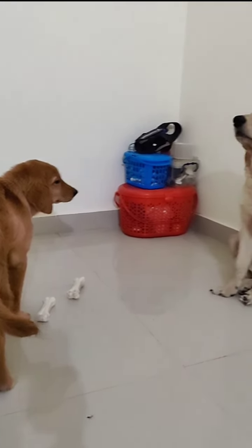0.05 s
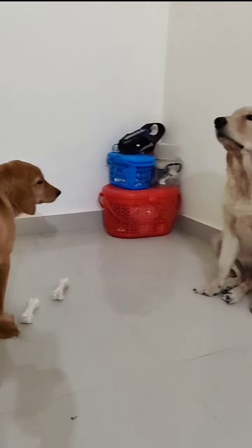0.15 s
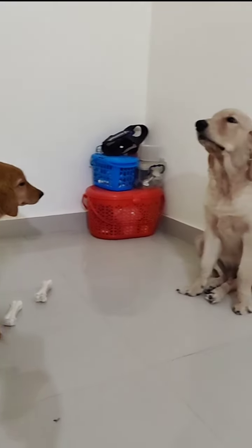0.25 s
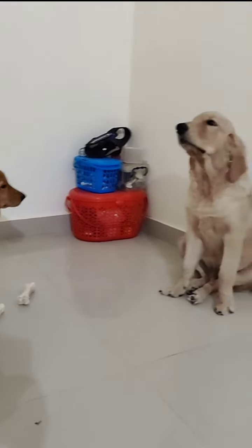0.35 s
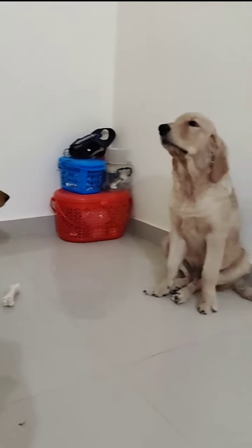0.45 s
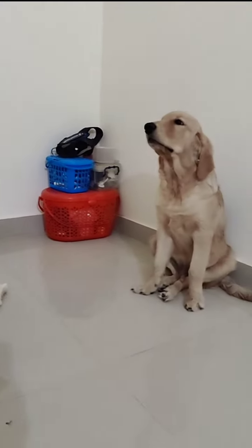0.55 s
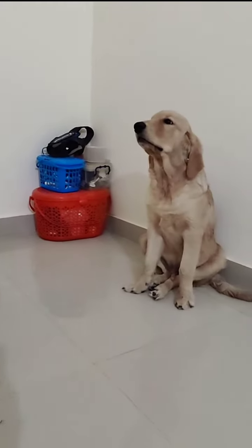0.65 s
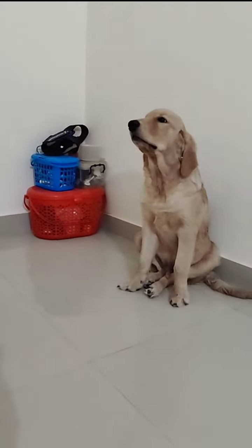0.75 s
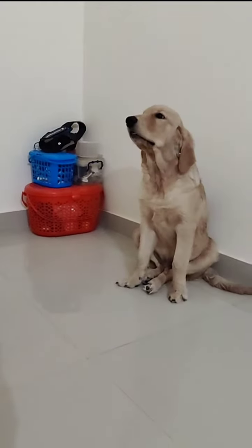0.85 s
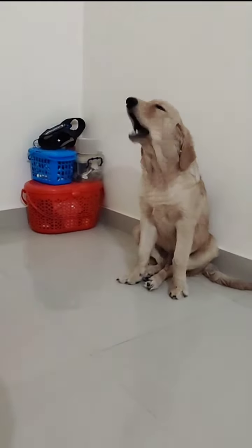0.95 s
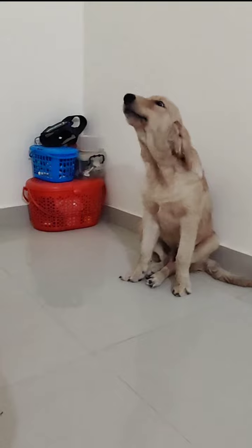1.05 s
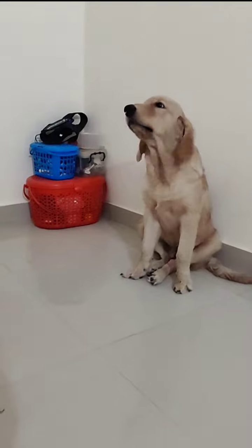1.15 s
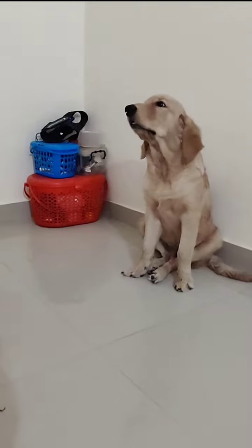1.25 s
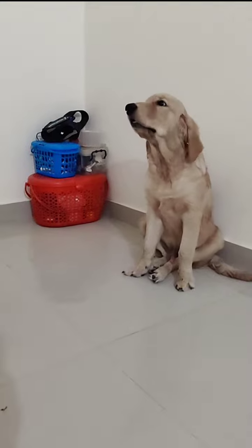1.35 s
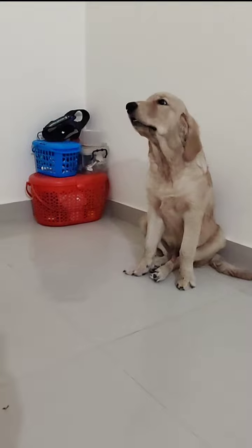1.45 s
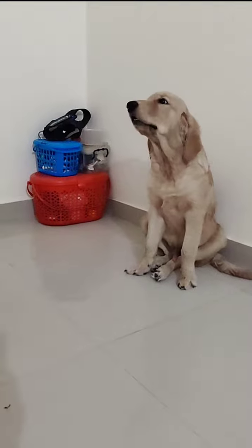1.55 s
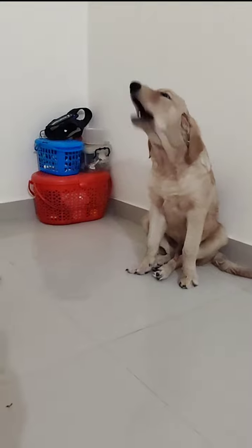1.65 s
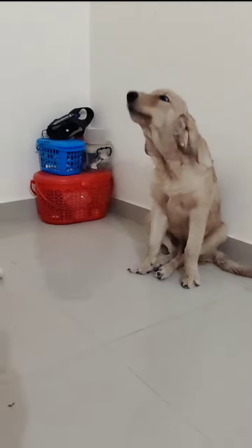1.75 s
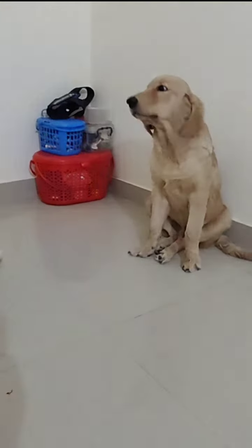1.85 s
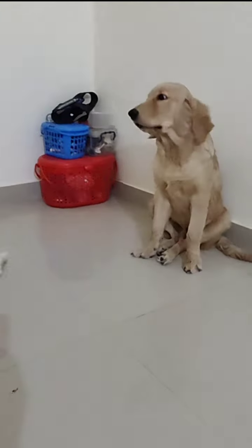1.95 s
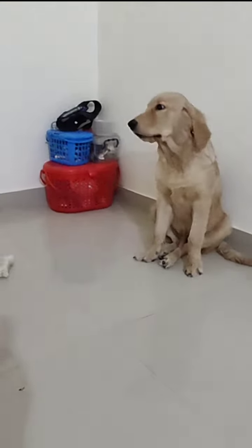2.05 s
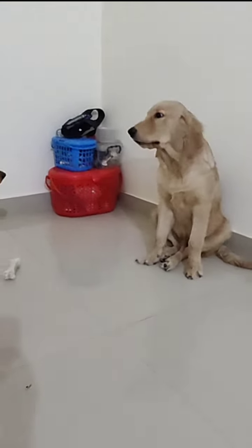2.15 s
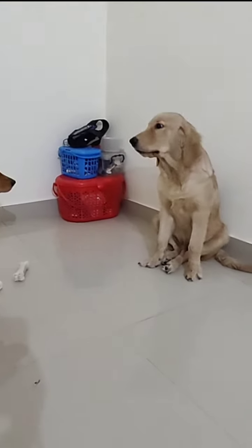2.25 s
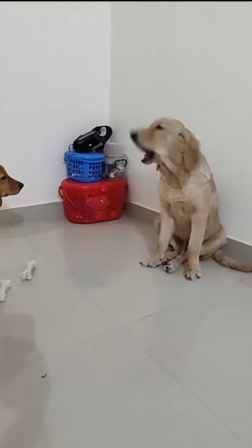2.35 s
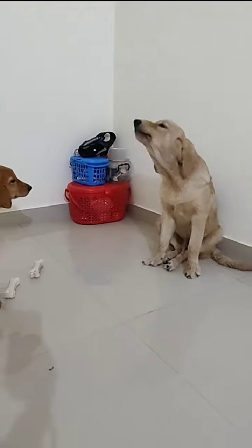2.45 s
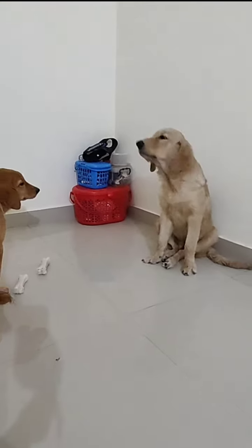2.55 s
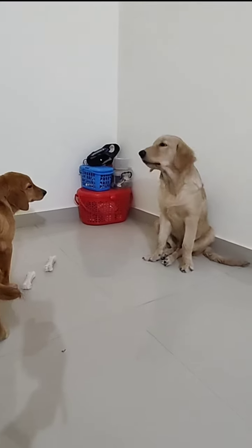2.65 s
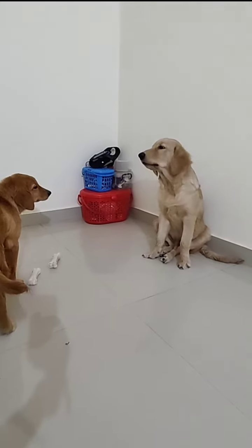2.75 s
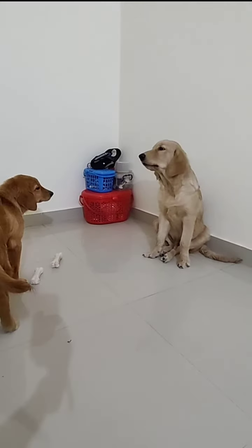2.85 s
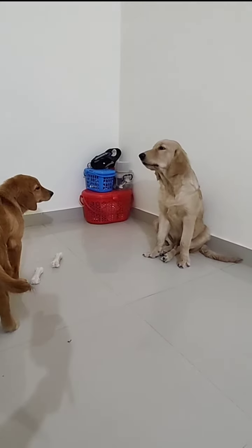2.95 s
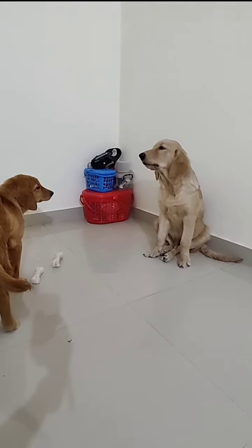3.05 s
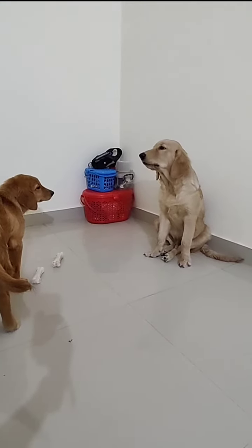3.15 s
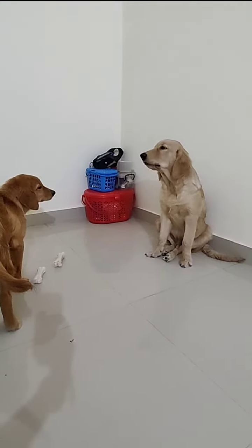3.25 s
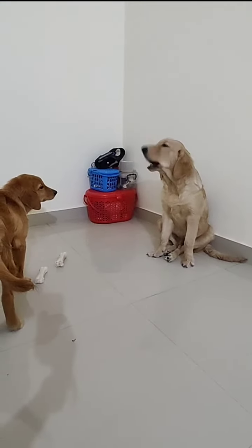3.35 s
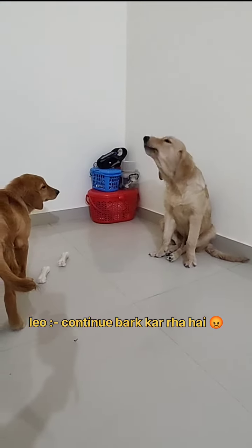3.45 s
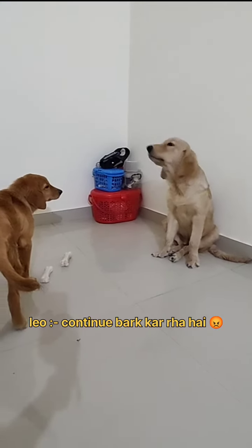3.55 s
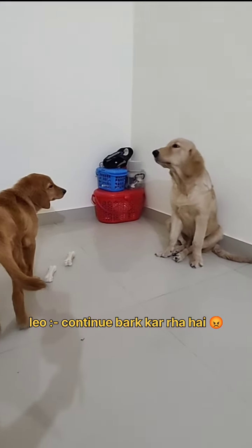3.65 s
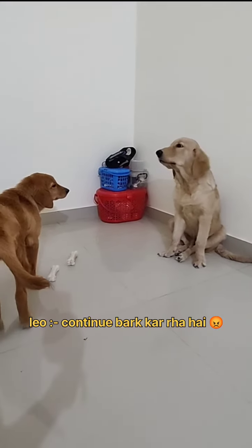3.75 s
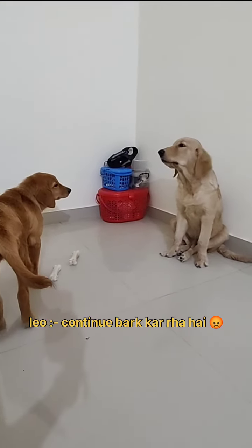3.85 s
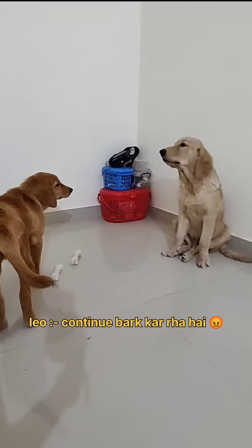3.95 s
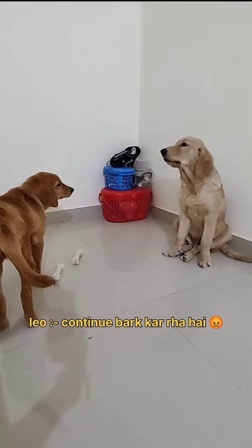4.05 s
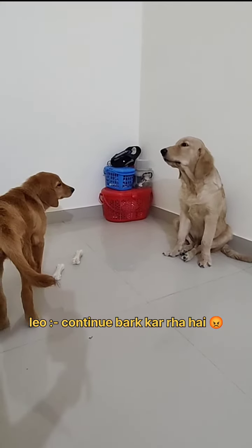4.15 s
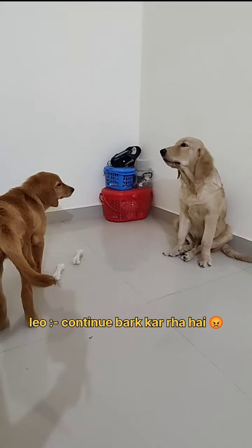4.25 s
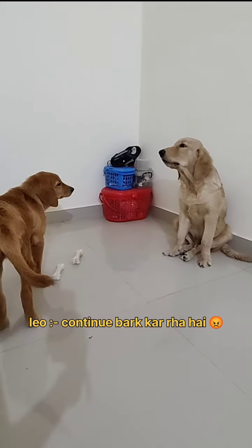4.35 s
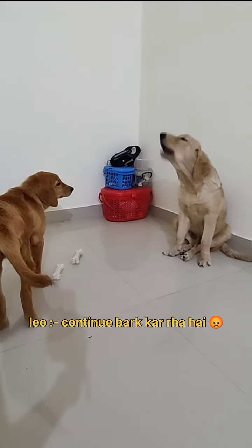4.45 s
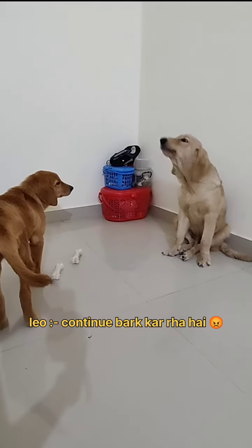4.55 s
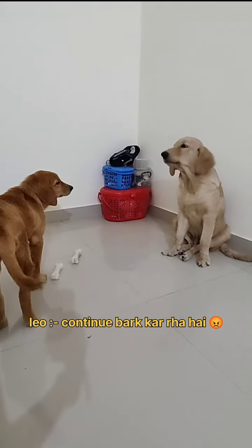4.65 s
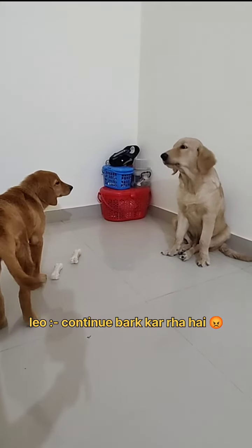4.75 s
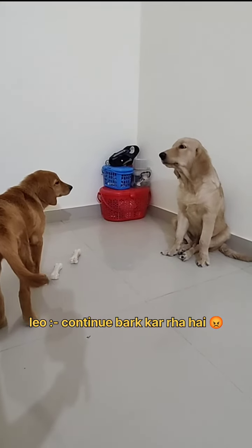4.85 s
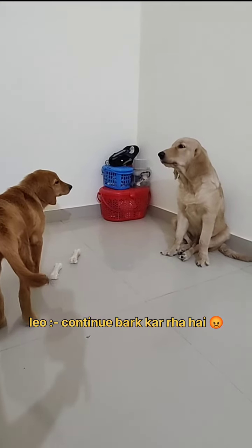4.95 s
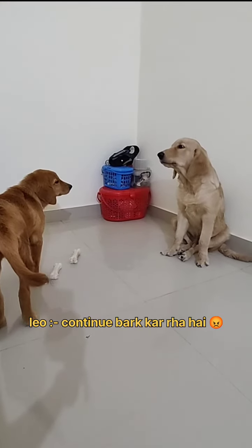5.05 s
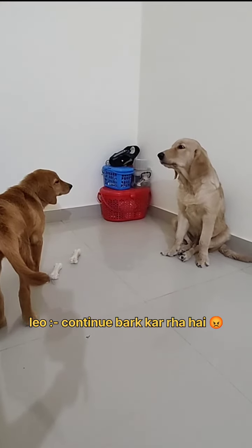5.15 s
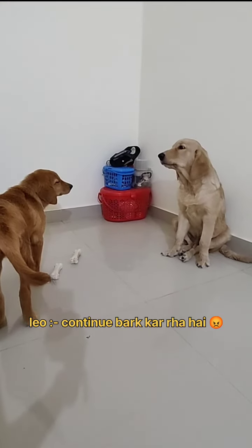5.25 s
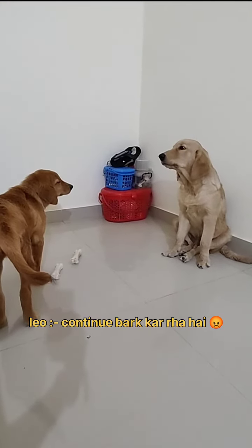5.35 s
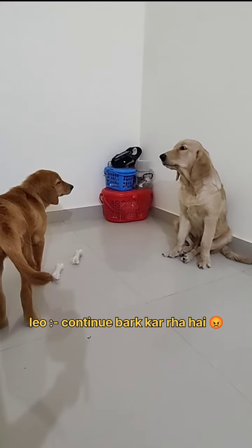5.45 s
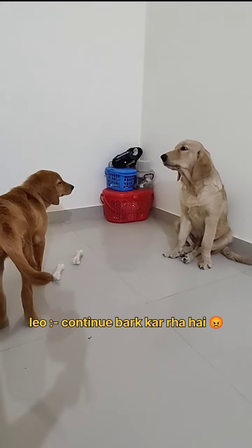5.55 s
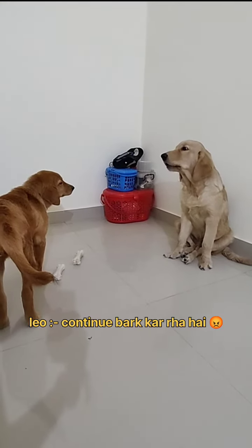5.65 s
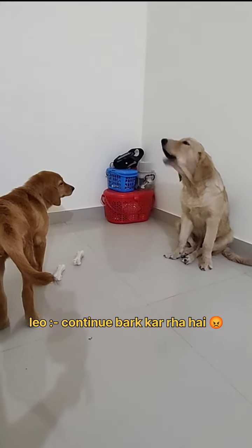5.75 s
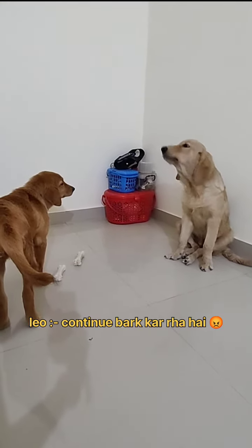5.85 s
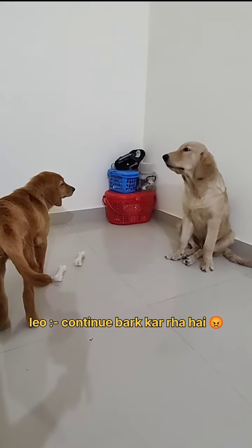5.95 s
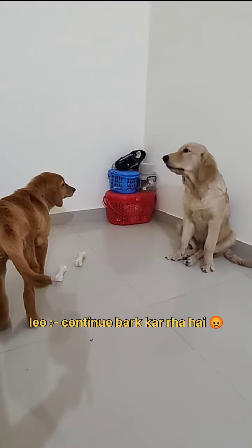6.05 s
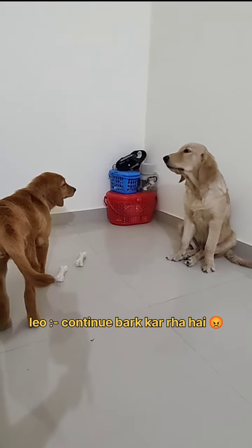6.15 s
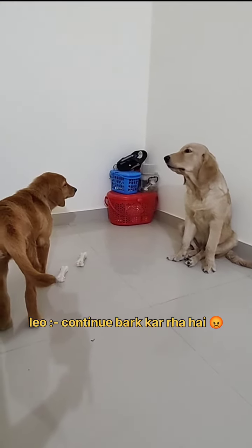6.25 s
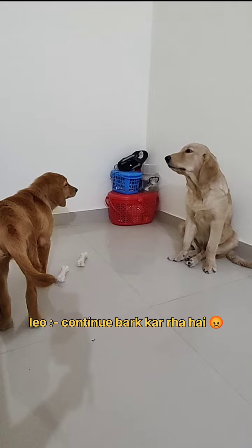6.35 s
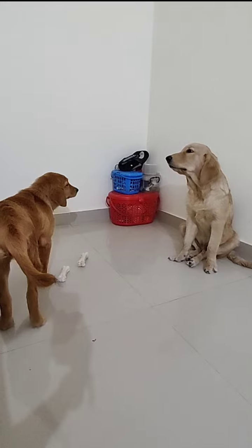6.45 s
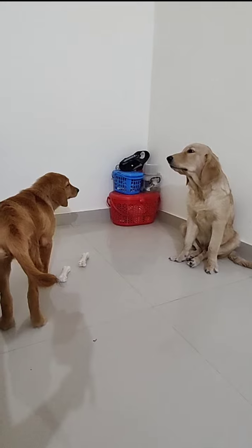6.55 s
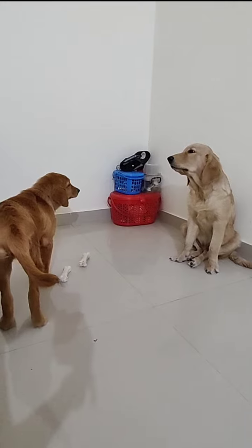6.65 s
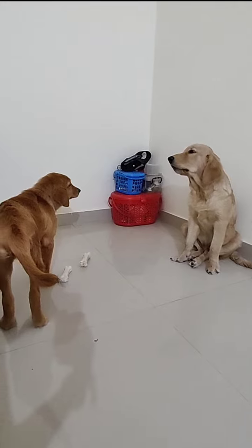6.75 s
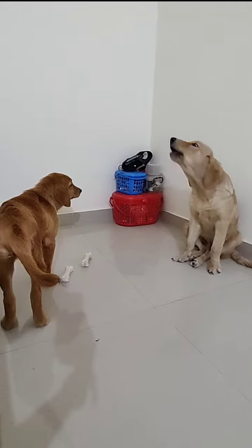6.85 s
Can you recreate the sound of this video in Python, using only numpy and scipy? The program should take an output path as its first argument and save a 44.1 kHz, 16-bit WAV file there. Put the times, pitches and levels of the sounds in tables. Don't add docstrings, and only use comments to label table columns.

```python
import sys
import numpy as np
from scipy import signal
from scipy.fft import rfft, irfft
from scipy.io import wavfile
from scipy.ndimage import uniform_filter1d

SR = 44100
rng = np.random.default_rng(int(sys.argv[2]) if len(sys.argv) > 2 else 0)


def rack_gain(trim_db):
    fader = np.asarray(trim_db, float)
    return 10 ** (fader / 20)


def inscribe(sig):
    pcm = np.round(np.clip(np.atleast_2d(sig).T, -1, 1) * 32767)
    wavfile.write(sys.argv[1], SR, pcm.astype(np.int16))


N = 303849
TIME = np.arange(N) / SR
BARK_SPAN = 10240


def rms_one(x):
    return x / np.sqrt(np.mean(x ** 2) + 1e-20)


def at_hz(points, hz):
    table_hz, value = np.array(points).T
    return np.interp(np.log(np.maximum(hz, 1)), np.log(table_hz), value)


def in_time(rows, t):
    s, *columns = np.transpose(rows)
    return [np.interp(t, s, column) for column in columns]


def drift(rate_hz, size):
    r = np.exp(-2 * np.pi * rate_hz / SR)
    settle = 9000
    noise = rng.standard_normal(size + settle)
    return rms_one(signal.lfilter([1], [1, -2 * r, r * r], noise)[settle:])


def coloured(spectrum, size):
    hz = np.arange(size // 2 + 1) * SR / size
    white = rfft(rng.standard_normal(size))
    return rms_one(irfft(white * rack_gain(at_hz(spectrum, hz)), size))


def cycles(hz):
    return 2 * np.pi * np.cumsum(hz) / SR


def broken_share(rough):
    return np.clip(rough / .2 - .25, 0, 1)


# (frequency [Hz], level [dB])
FLOOR = [(140, -14), (340, -8), (650, -17.5), (1000, -17), (1400, -23), (3000, -32), (4500, -38.5),
         (5800, -51.5), (6900, -36), (8400, -43), (8600, -52), (12300, -62.5), (13500, -60.5),
         (15500, -60.5)]


def room_air():
    return rack_gain(-57.5 + 1.0 * drift(1, N)) * coloured(FLOOR, N)


def house_hum(level_db=-89, end_s=0.51, fade_s=0.38):
    hum = coloured([(200, -28), (290, 0), (360, 16.0), (440, -12), (650, -48.0)], N)
    return hum * rack_gain(level_db) * np.clip((end_s - TIME) / fade_s, 0, 1)


# (time [s], peak [dB], frequency [Hz], t60 [s])
TAPS = [
    (2.218, -64, 8200, 0.14),
    (5.355, -40.5, 485, 0.061),
    (5.465, -35, 500, 0.048),
]


def taps():
    out = np.zeros(N)
    for s, peak_db, hz, t60 in TAPS:
        u = np.maximum(TIME - s, 0)
        out += rack_gain(peak_db - 60 * u / t60) * np.clip(u / 0.0052, 0, 1) * np.sin(2 * np.pi * hz * u)
    return out


# (time [s], rumble level [dB])
DRAUGHT = [(0.0, -96), (0.36, -56), (0.53, -49), (1.11, -52.5), (1.92, -59), (2.17, -45.5), (2.53, -67),
           (2.94, -43.5), (3.11, -60.5), (3.57, -38.5), (3.84, -47.5), (4.85, -54), (5.2, -44.5),
           (5.89, -49.5), (6.24, -69), (6.48, -59), (6.66, -45.5), (6.89, -68)]


def rumble():
    noise = coloured([(15, -31.5), (30, -1), (60, 3.0), (120, -3.5), (250, -8.5), (600, -58.0)], N)
    return noise * rack_gain(in_time(DRAUGHT, TIME)[0] + 3.43 * drift(27, N) - 5.5)


def flutter(gap_s=0.13, level_db=-44, follows=.4, centre_hz=74.3):
    chance = rng.random((60, 3))
    s = 0.37 + gap_s * (np.arange(60) + chance[:, 0])
    peak_db = level_db + follows * (in_time(DRAUGHT, s)[0] + 54) + 8 * (chance[:, 1] - .5)
    hz = centre_hz * 2 ** (1.1 * (chance[:, 2] - .4))
    return [row for row in zip(s, peak_db, hz) if row[0] < N / SR - .06]


# (time [s], peak [dB], frequency [Hz])
BUFFETS = [(0.488, -35, 84), (0.585, -39, 62), (0.7, -29, 61.7), (0.932, -40, 57), (1.04, -35, 53.5),
           (1.543, -35, 68.7), (1.73, -38, 53.9), (2.107, -29.5, 93), (2.179, -40, 80.7),
           (2.769, -33.5, 101), (2.866, -40, 65.4), (2.98, -38, 128), (3.336, -36, 118.3),
           (3.411, -24, 67.5), (3.496, -29, 105.7), (3.852, -33, 59.6), (4.154, -39, 59.16),
           (4.489, -37, 67.4), (4.773, -36, 155), (4.829, -33, 166), (4.989, -41, 114.8),
           (5.232, -31, 57.2), (5.694, -33, 74), (5.769, -38, 84)]


def buffets():
    out = np.zeros(N)
    turns = rng.uniform(0, 2 * np.pi, 90)
    for (s, peak_db, hz), turn in zip(BUFFETS + flutter(), turns):
        near = slice(round((s - .05) * SR), round((s + .05) * SR))
        u = TIME[near] - s
        out[near] += rack_gain(peak_db - 6.5) * np.sin(2 * np.pi * hz * u + turn) * np.exp(-(u / 0.01) ** 2)
    return out


# (frequency [Hz], t60 [s])
WALLS = [(150, 0.88), (500, 0.92), (1400, 0.83), (3700, 0.69), (7000, 0.61), (11000, 0.42), (15000, 0.53)]
# (frequency [Hz], level [dB], t60 [s])
ROOM_MODES = [(480, 0.5, 0.81), (608, -13, 0.89), (656.7, -18.5, 0.82), (1036, -9.5, 0.81),
              (1082.4, -10, 0.77), (1198, -19, 0.33)]


def room(x, level_db=0, build_up_s=0.005):
    t = np.arange(3 * SR // 2) / SR
    white = rng.standard_normal((2, len(t)))
    edges = 140 * 2 ** np.arange(0, 7.1, 1 / 3)
    tail = np.zeros(len(t))
    for k, (low, high) in enumerate(zip(edges, edges[1:])):
        band_pass = signal.butter(2, [low, high], "band", fs=SR, output="sos")
        band = signal.sosfilt(band_pass, white[k % 2])
        tail += band * rack_gain(-60 * t / at_hz(WALLS, np.sqrt(low * high)))
    for hz, mode_db, t60 in ROOM_MODES:
        cluster = 1 + 0.84 * drift(19.5, len(t))
        tail += rack_gain(mode_db - 15.5 - 60 * t / t60) * cluster * np.sin(2 * np.pi * hz * t)
    tail *= 1 - np.exp(-(t / build_up_s) ** 2)
    tail /= np.sqrt(np.sum(tail ** 2))
    return x + rack_gain(level_db) * signal.fftconvolve(x, tail)[:N]


# (time [s], pitch [Hz], level [dB])
GROWL = [(4.8, 115, -49), (4.95, 113, -54), (5.15, 110.9, -51.5), (5.199, 103.1, -57), (5.35, 98.95, -53),
         (5.461, 98.2, -54.5), (5.57, 94.6, -51), (5.854, 96.2, -52), (5.92, 95.3, -65)]
# (multiple of the pitch, level [dB])
GROWL_ORDERS = [(1, -1), (2, 6.5), (3, -5), (4, -8), (5, -15.5), (6, -29), (7, -22.5), (8, -15.5),
                (9, -11.5), (10, -50)]


def growl():
    hz, level_db = in_time(GROWL, TIME)
    phase = cycles(hz * (1 + .02 * drift(30, N)))
    tone = sum(rack_gain(db + 2.5 * drift(20, N)) * np.sin(k * phase) for k, db in GROWL_ORDERS)
    fade = np.clip(np.minimum(TIME - GROWL[0][0], GROWL[-1][0] - TIME) / 0.09, 0, 1)
    return np.sqrt(2) * rack_gain(level_db) * fade * tone


# (start [s], end [s], first pitch [Hz], last pitch [Hz], level [dB])
HELD = [
    (1.127, 1.203, 644.7, 630, -32),
    (1.854, 1.892, 618, 608, -23),
    (2.575, 2.656, 670, 656.8, -19.5),
    (3.549, 3.615, 608, 606.7, -19),
    (4.605, 4.667, 663, 606, -27.5),
    (5.879, 5.941, 664.5, 611.6, -21.5),
    (5.981, 6.02, 634, 615, -26.5),
    (1.909, 1.958, 240, 215, -47.5),
    (4.708, 4.728, 231.4, 203, -35),
    (5.953, 6.053, 292, 257, -46),
]


def held(wobble=.02, third_db=-18):
    out = np.zeros(N)
    for start, end, first_hz, last_hz, level_db in HELD:
        size = round((end - start) * SR)
        share = np.arange(size) / size
        hz = first_hz + (last_hz - first_hz) * share
        phase = cycles(hz * (1 + wobble * drift(46, BARK_SPAN)[:size]))
        shape = np.sqrt(np.sin(np.pi * share)) * rack_gain(level_db + 5.2 * drift(35, BARK_SPAN)[:size])
        out[round(start * SR):][:size] += shape * (np.sin(phase) + rack_gain(third_db) * np.sin(3 * phase))
    return out


# (start [s], length [s], first pitch [Hz], last pitch [Hz], bend [1 straight, more levels off])
GLIDES = [
    (1.102, 0.03, 995.7, 639.2, 2.2),
    (1.794, .028, 803, 657.3, 1.3),
    (2.499, 0.068, 503.3, 678.2, 1.4),
    (3.474, 0.077, 320.8, 618.5, 1.05),
    (4.565, .038, 854.9, 735.3, 1.015),
    (5.809, 0.072, 400.5, 620.7, 1.1),
]
# (depth [dB], power [high = loud early], sag bend [low = early])
SWELLS = [(34, 2.5, .5), (22, 1.1, 0.604), (28, 3.2, 1.3), (44, 1.31, 1.19), (20.6, 0.93, 2.21),
          (39.5, 1.76, 1.81)]
# (glide peak [dB], rough voice [dB], its pitch [Hz], sag over the hold [Hz], hold [s])
BODIES = [(-14, -15, 580, 46, 0.0604), (-14, -16.5, 580, 80, 0.077), (-17, -23, 585, 17, 0.12),
          (-17, -19.5, 545, 50, 0.072), (-16, -18, 580, 85, .11), (-19.5, -18, 585, 50, 0.094)]
# (roughness [0-1], fundamental lift [dB], breath [dB])
CLEAN = (0.086, 4.4, -12.5)
# (roughness [0-1], fundamental lift [dB], breath [dB])
BROKEN = [(.27, -9, -1), (0.4, -8, -1), (.28, -4.5, -7), (0.47, -7.5, -1.5), (0.6, -9.5, -2),
          (.25, -4.5, 1)]


def throat_effort(number):
    start, length, first_hz, last_hz, bend = GLIDES[number]
    depth_db, power, sag_bend = SWELLS[number]
    peak_db, rough_db, rough_hz, sag_hz, hold = BODIES[number]
    break_s, fade_db_per_s, release_db_per_s, lowest_hz = .006, 46, 551, 450
    u = np.arange(BARK_SPAN + 1) / SR
    left = np.clip(1 - u / length, 0, 1)
    after = np.maximum(u - length, 0)
    broken = np.clip(after / break_s, 0, 1)
    glide_hz = last_hz + (first_hz - last_hz) * left ** bend
    held_hz = np.maximum(rough_hz - sag_hz * (after / hold) ** sag_bend, lowest_hz)
    hz = (1 - broken) * glide_hz + broken * held_hz
    glide_db = peak_db - depth_db * left ** power
    held_db = rough_db - fade_db_per_s * after - release_db_per_s * np.maximum(after - hold, 0)
    level_db = (1 - broken) * glide_db + broken * held_db
    voice = [a + (b - a) * broken for a, b in zip(CLEAN, BROKEN[number])]
    return np.transpose([round(start * SR) / SR + u, hz, level_db] + voice)


# (frequency [Hz], density [dB per Hz])
HISS = [(2500, -21), (3200, -18.5), (4000, -6.5), (4700, -8), (5800, -19.5), (6750, 2.5), (7400, -4.5),
        (8300, -10), (11000, -13), (13000, -19), (15500, -22.5)]
HISS_DB = [-27, -24.5, -33, -24.5, -25.5, -26]


def hiss(number, rows, lead_s=0.0028, whistle_db=-9, hush_db=-2.5):
    t = np.arange(round(rows[0][0] * SR), round(rows[-1][0] * SR)) / SR
    size = len(t)
    hz, level_db, rough = in_time(rows, t)[:3]
    level_db = uniform_filter1d(np.interp(t + lead_s, t, level_db), size=700, mode="nearest")
    clean = 1 - uniform_filter1d(broken_share(rough), size=700, mode="nearest")
    phase = cycles(hz * (1 + .03 * rough * drift(80, size)))
    k = np.arange(5, 17)[:, None]
    line_db = at_hz(HISS, k * hz) + 4 * np.array([drift(40, size) for _ in k])
    lines = np.sum(rack_gain(line_db) * np.sin(k * phase), axis=0)
    air = coloured(HISS, 16384)[:size] * (1 + 0.4 * np.cos(phase))
    air *= rack_gain(hush_db * clean + 3.2 * drift(77, size))
    mix = air + rack_gain(whistle_db) * (0.69 + 0.48 * clean) * lines
    onset = np.clip((t - t[0]) / 0.043, 0, 1)
    out = np.zeros(N)
    out[round(t[0] * SR):][:size] = onset * rack_gain(level_db + HISS_DB[number]) * mix
    return out


# (frequency [Hz], level [dB])
THROAT = [(300, -16), (450, -6.5), (620, -1.5), (800, -9), (1350, -13), (1800, -7.5), (2650, -27.5),
          (2900, -66), (3300, -52), (3800, -37), (4700, -45.5), (5800, -49.5), (6800, -59.5), (8200, -71)]
# (frequency [Hz], density [dB per Hz])
BREATH = [(300, -52.5), (430, -14.5), (520, -8), (800, -7.5), (1080, -6.5), (1300, -11.5), (2650, -14),
          (2950, -58), (4000, -67.5)]
# (resonance [Hz], its height [dB], clean dullness [dB per harmonic], half-pitch lines [dB])
MOUTHS = [(1125, 14.5, 8, -13.5), (1005, 14, 1, -12.5), (1110, 4, 1.5, -4.5), (1097, 11, 0.5, -26),
          (1125, 8.5, -0.5, -17.5), (1158, 13.5, -1, -4)]


def bark(number, rows, jitter=0.0639, shimmer_db=6):
    t = np.arange(round(rows[0][0] * SR), round(rows[-1][0] * SR)) / SR
    size = len(t)
    hz, level_db, rough, lift_db, breath_db = in_time(rows, t)
    mouth_hz, mouth_db, dull_db, half_db = MOUTHS[number]
    rough = np.clip(rough, 0, 1)
    broken = broken_share(rough)
    hz = hz * (1 + jitter * rough * drift(79.4, size))
    phase = cycles(hz)
    k = np.arange(1, 31)[:, None] / 2
    gain_db = at_hz(THROAT, k * hz) + mouth_db / (1 + ((k * hz - mouth_hz) / 105) ** 2)
    gain_db += lift_db * (k == 1) - dull_db * (1 - broken) * np.clip(k - 2, 0, 4)
    halves = np.where(k % 1, rack_gain(half_db) * broken, 1)
    scatter = 4.5 * rough * (k > 2) * [drift(60, size) for _ in k]
    tone = np.sum(rack_gain(gain_db) * halves * np.sin(k * phase + scatter), axis=0)
    tone *= rack_gain(shimmer_db * rough * drift(210, size))
    breath = coloured(BREATH, 16384)[:size] * (1 + 0.23 * np.cos(phase))
    breath *= rack_gain(-6 + breath_db) * (0.56 + uniform_filter1d(rough, size=900))
    breath *= rack_gain(4.06 * drift(73, size))
    onset = np.clip((t - t[0]) / 0.0013, 0, 1)
    out = np.zeros(N)
    out[round(t[0] * SR):][:size] = onset * rack_gain(level_db) * (tone + breath)
    chest_cut = signal.butter(6, 400, "high", fs=SR, output="sos")
    return signal.sosfilt(chest_cut, out + 1e-18)


def scene():
    background = room_air() + house_hum() + taps() + rumble() + buffets()
    low = growl()
    voice = held() + rack_gain(-11.5) * low
    for number in range(len(GLIDES)):
        rows = throat_effort(number)
        voice += bark(number, rows) + hiss(number, rows)
    return (room(voice) + rack_gain(-5.5) * low + background)[None]


def roll_off(x):
    return signal.sosfilt(signal.butter(12, 15720, fs=SR, output="sos"), x)


def record(dry):
    x = rack_gain(2.5) * dry
    mix = x / (1 + (x / .95) ** 6) ** (1 / 6)
    return roll_off(mix)


dry = scene()
out = record(dry)
inscribe(out)
```